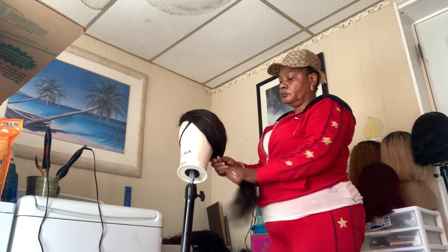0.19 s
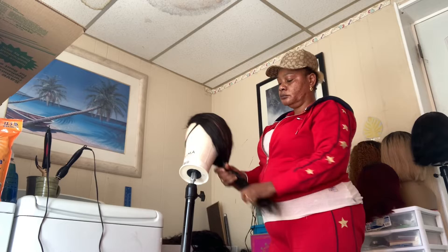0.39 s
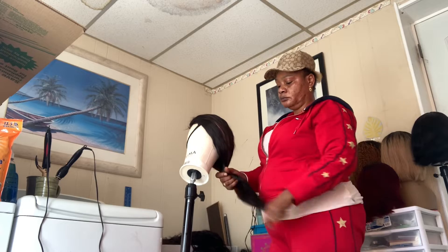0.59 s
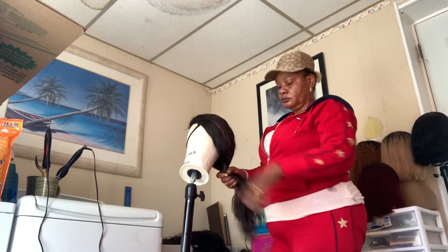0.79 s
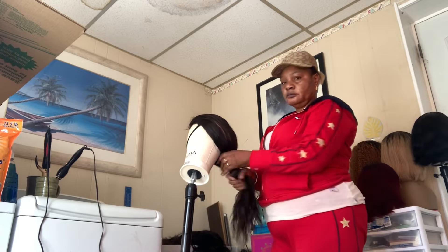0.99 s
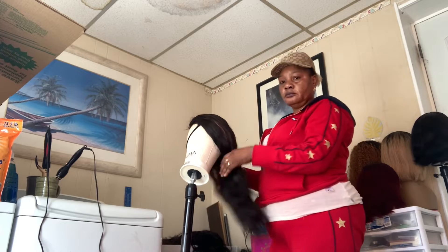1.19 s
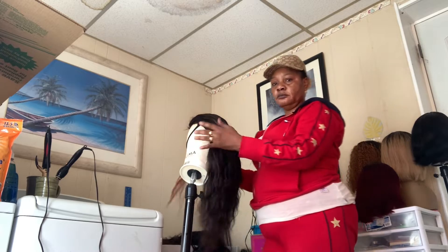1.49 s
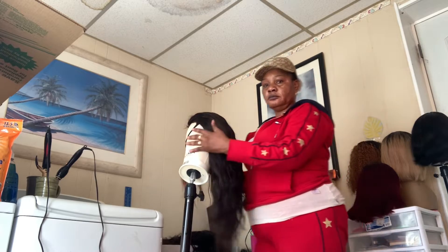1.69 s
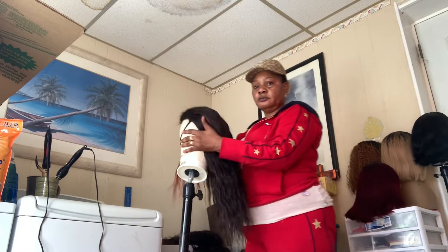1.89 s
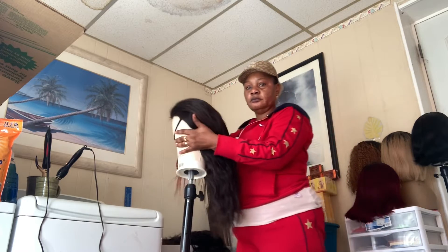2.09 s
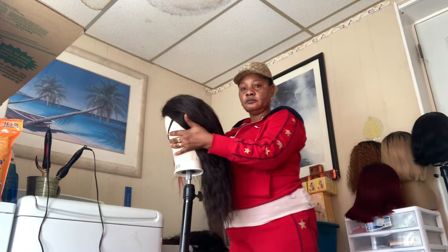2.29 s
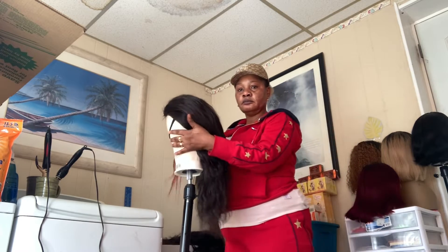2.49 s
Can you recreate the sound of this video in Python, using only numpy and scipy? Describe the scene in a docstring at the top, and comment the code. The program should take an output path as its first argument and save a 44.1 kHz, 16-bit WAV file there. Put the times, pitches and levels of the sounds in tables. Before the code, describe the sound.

Metal bangles clink in three brief moments, the last weaker, as hands smooth a long wig. Between and after them the mannequin head clicks drily on its stand; faint hair rustle, small quiet room, fairly close microphone.

```python
"""Metal bangles clink in three moments as an arm moves: hands smooth a long wig on a mannequin head
in a small, quiet room. Each clink is a coloured noise burst with a room tail, plus ringing modes.
The head clicks on its stand in the same way, and fingers and nails tick faintly.
Hair strokes are swells of coloured noise and snags; soft low bumps and a rumble lie beneath."""
import sys
import numpy as np
from scipy import signal
from scipy.fft import rfft, irfft
from scipy.io import wavfile

SR = 44100
rng = np.random.default_rng(int(sys.argv[2]) if len(sys.argv) > 2 else 0)


def dump_mix(stems):
    """Bounce the given channels to the path in sys.argv[1] as a 16-bit WAV at rate SR."""
    frames = np.atleast_2d(stems).T  # one column per channel
    limited = np.clip(frames, -1, 1)  # hard clip at full scale
    pcm = np.round(limited * 32767).astype(np.int16)
    wavfile.write(sys.argv[1], SR, pcm)


N = 114660
T = np.arange(N) / SR
AFTER = T[:SR // 2]  # time since a hit, s


def undb(db):
    """Decibels to gain."""
    return 10 ** (np.asarray(db) / 20)


def unit(x):
    """Scale to rms 1."""
    return x / np.sqrt(np.mean(x ** 2))


def freqs(size):
    """Frequencies in Hz of a spectrum of this length, kept above zero for logarithms."""
    return np.maximum(np.fft.rfftfreq(size, 1 / SR), 1)


def along(points, hz):
    """Read (Hz, value) points on a log-frequency axis."""
    point_hz, value = np.array(points).T
    return np.interp(np.log(hz), np.log(point_hz), value)


def noise(db, size):
    """Random-phase noise of rms 1 with the given spectrum in dB."""
    phases = np.exp(2j * np.pi * rng.random(size // 2 + 1))
    return unit(irfft(undb(db) * phases, size))


def white():
    """Flat noise as long as one hit."""
    return noise(np.zeros(len(AFTER) // 2 + 1), len(AFTER))


def colour(x, db):
    """Shape a sound with a causal (minimum-phase) filter of the given response and unit power gain."""
    size = len(x)
    cepstrum = irfft(np.log(unit(undb(db))), size)
    # folding the cepstrum onto positive time makes the filter causal
    cepstrum[1:size // 2] *= 2
    cepstrum[size // 2 + 1:] = 0
    return irfft(rfft(x) * np.exp(rfft(cepstrum)), size)


def swell(middle_s, half_s, db):
    """A smooth bell-shaped rise and fall around a moment."""
    return undb(db) * np.exp(-((T - middle_s) / half_s) ** 2)


def add(out, start_s, x):
    """Mix a sound in at a time."""
    i = max(int(start_s * SR), 0)
    out[i:i + len(x)] += x[:N - i]


# spectrum of the room's rumble and hiss: freq_hz [Hz], density_db [dB per Hz, relative]
AIR_COLOUR = [(15, -47), (25, -2), (102, 1.5), (170, -5.5), (249, -4.5), (416, -9), (560, -12.5),
              (714, -13.5), (1370, -17), (2050, -20.5), (3160, -18.5), (5430, -23.5), (5880, -21),
              (13200, -24.5), (16000, -28.5)]
AIR_DB, HUM_DB, HUM_HZ = -66, -77, 120


def room():
    """Steady noise, strongest in the lows, with a faint sine of mains hum."""
    air = undb(AIR_DB) * noise(along(AIR_COLOUR, freqs(N)), N)
    hum = undb(HUM_DB) * unit(np.sin(2 * np.pi * HUM_HZ * T))
    return air + hum


# soft low bumps of the handling: middle_s [s], half_length_s [s], level_db [dB], centre_hz [Hz]
BUMPS = [(0.963, 0.013, -59, 122), (1.027, 0.065, -61.5, 71.5), (1.666, 0.048, -61.5, 138),
         (1.973, 0.089, -64.5, 73.4)]


def bumps():
    """Body and stand shift: dull swells of noise, each gathered around one low frequency."""
    out = np.zeros(N)
    for middle_s, half_s, db, centre_hz in BUMPS:
        octaves = np.log2(freqs(N) / centre_hz)
        low_noise = noise(-20 * np.log10(1 + (octaves / 0.28) ** 2), N)
        out += swell(middle_s, half_s, db) * low_noise
    return out


# strokes over the hair: middle_s [s], half_length_s [s], level_db [dB], brightness_db [dB per octave]
STROKES = [(0.06, 0.12, -64.5, -1), (0.591, 0.087, -67, 1), (0.962, 0.022, -68, 3.5),
           (1.22, 0.056, -88, -3), (2.09, 0.13, -75.5, -4.5), (2.257, .05, -72.5, -2),
           (2.483, 0.13, -71, -3)]
# spectrum of the hair rustle: freq_hz [Hz], density_db [dB per Hz, relative]
HAIR_COLOUR = [(300, -65), (1200, -8), (3500, 3), (7000, -2.5), (12000, -7), (16000, -9)]
STRANDS_PER_S, STRAND_DB = 1200, -1  # mean rate of snags, and their level against the smooth slide


def hair():
    """Strands slide (noise) and snag (random impulses) under the palm, louder during each stroke."""
    hz, out = freqs(N), np.zeros(N)
    snags = (rng.random(N) < STRANDS_PER_S / SR) * rng.standard_normal(N)
    slide = rng.standard_normal(N)
    rub = rfft(slide + undb(STRAND_DB) * unit(snags))
    for middle_s, half_s, db, tilt in STROKES:
        rustle_db = along(HAIR_COLOUR, hz) + tilt * np.log2(hz)
        rustle = unit(irfft(rub * undb(rustle_db), N))
        out += swell(middle_s, half_s, db) * rustle
    return out


# fading of a hit in the room: freq_hz [Hz], t60_s [s to fall 60 dB]
ROOM_T60 = [(300, 0.14), (800, 0.19), (2000, 0.17), (5500, .16), (14000, 0.13)]
CRACK_S = 0.0037  # decay time of the hard noise
LATE_DB, LATE_T60_S = -38, 0.49  # slow late tail, level against the room's first tail
BUILD_CYCLES = 1.63  # cycles that a contact takes to swell: lows come late
SPIKE_DB = 5  # impulse at the first instant, against the noise
SAME_PATH = 0.58  # share of the reflections' power that all hits of one object have in common


def crack(db, room_db, path):
    """A contact: a spike, a few ms of hard noise, then a room tail with its own fade in each band."""
    hz = freqs(len(AFTER))
    reflections = np.sqrt(SAME_PATH) * path + np.sqrt(1 - SAME_PATH) * white()
    spectrum, out = rfft(reflections), np.zeros(len(AFTER))
    hard = np.exp(-AFTER / CRACK_S)
    late = undb(room_db + LATE_DB - 60 * AFTER / LATE_T60_S)
    # overlapping octave bands; each identity row picks one band
    centres = 250 * 2. ** np.arange(7)
    for centre, share in zip(centres, np.eye(len(centres))):
        band = irfft(spectrum * np.interp(np.log(hz), np.log(centres), share), len(AFTER))
        tail = undb(room_db - 60 * AFTER / along(ROOM_T60, centre))
        build = 1 - np.exp(-AFTER * centre / BUILD_CYCLES)
        out += band * build * np.sqrt(hard ** 2 + tail ** 2 + late ** 2)
    spike = undb(SPIKE_DB) * (AFTER == 0)
    return colour(out + spike, db)


WAVER_HZ, WAVER_DEPTH, WAVER_RISE_S = 64.6, 1, 0.0023  # two random phase steps per waver cycle
RING_BUILD_CYCLES = 10.9  # cycles that a mode takes to swell


def ring(modes, tilt):
    """Fading modes that waver more and more as their reflections arrive."""
    out = np.zeros(len(AFTER))
    reflected = WAVER_DEPTH * (1 - np.exp(-AFTER / WAVER_RISE_S))
    for hz, db, t60 in modes:
        steps = np.exp(2j * np.pi * rng.random(size=64))
        waver = np.interp(AFTER * 2 * WAVER_HZ, np.arange(len(steps)), steps)
        direct = steps[-1]
        tone = np.imag((direct + reflected * waver) * np.exp(2j * np.pi * hz * AFTER))
        build = 1 - np.exp(-AFTER * hz / RING_BUILD_CYCLES)
        # brightness pivots at 4 kHz
        fade = undb(db + tilt * np.log2(hz / 4000) - 60 * AFTER / t60)
        out += tone * build * fade
    return out


# faint ticks of fingers and nails:
# start_s [s], level_db [dB], centre_hz [Hz], width_oct [octaves], skirt_db [dB, broad skirt]
TICKS = [(0.4345, -43.5, 3660, 0.15, -8), (0.681, -56, 11700, 0.24, -28), (2.274, -67, 8000, 1, -13),
         (2.306, -61, 1300, 1, -9)]
TICK_ROOM_DB = -6.5


def nails():
    """Tiny contacts, each coloured by one resonance on a broad skirt."""
    out, hz = np.zeros(N), freqs(len(AFTER))
    for start_s, db, centre_hz, width_oct, skirt_db in TICKS:
        octaves = np.log2(hz / centre_hz)
        peak = np.exp(-2 * (octaves / width_oct) ** 2)
        skirt = undb(skirt_db) / (1 + octaves ** 2)
        tick = crack(20 * np.log10(peak + skirt), TICK_ROOM_DB, white())
        add(out, start_s, undb(db) * tick)
    return out


# clicks of the head on its stand:
# start_s [s], level_db [dB], brightness_db [dB per octave], room_db [dB], ring_db [dB]
CLICKS = [(.0084, -39, -0.5, -1.5, -53), (.3008, -34, .3, -11.5, -43), (.3148, -36, -1.5, -10, -47),
          (.3369, -34, .2, -11, -41.5), (1.0865, -43.5, -2.5, -5, -49), (1.6985, -48.5, -2.5, -6.5, -53),
          (1.7329, -37.5, 0, -5.5, -38.5), (1.7938, -36, 0, -3.5, -36), (1.8197, -37, 0.5, -6.5, -32.5),
          (1.8322, -38, -1, -7, -52), (1.886, -46, -1.5, -9, -61), (1.9152, -32, 0, -7, -33)]
# spectrum of a stand click: freq_hz [Hz], density_db [dB per Hz, relative]
CLICK_COLOUR = [(100, -14.5), (220, -2.5), (400, 3), (750, -3.5), (1300, 0), (2000, -0.5), (3000, -1.5),
                (4200, -0.5), (6000, -1.5), (9000, -6), (12500, -6.5), (16000, -14.5)]
# stand modes, one list per column: pitch_hz [Hz]
STAND_HZ = [410, 538, 1330, 1970, 2190, 2850, 3740, 4290, 4860, 6010]
# level_db [dB, relative]
STAND_DB = [-19.5, -14, -13, -15, -13, -15.5, -10, -26, -16, -17]
# t60_s [s to fall 60 dB]
STAND_T60_S = [0.12, 0.12, 0.14, 0.11, 0.083, 0.18, .13, 0.097, 0.17, 0.17]
RING_DULLING = 2  # the ring's brightness tilts this many times more than the click's


def stand():
    """The head slips on its stand in dry clicks that excite the stand's modes."""
    out, hz, path = np.zeros(N), freqs(len(AFTER)), white()
    for start_s, db, tilt, room_db, ring_db in CLICKS:
        click_db = along(CLICK_COLOUR, hz) + tilt * np.log2(hz)
        click = undb(db) * crack(click_db, room_db, path)
        modes = zip(STAND_HZ, STAND_DB, STAND_T60_S)
        add(out, start_s, click + undb(ring_db) * ring(modes, RING_DULLING * tilt))
    return out


# bangle contacts: start_s [s], level_db [dB], brightness_db [dB per octave], room_db [dB],
# ring_db [dB], ring_brightness_db [dB per octave]
CLINKS = [(0.2125, -22, -1, -6.5, -33.5, -0.5), (0.2137, -27, -1, -12, -47.5, -2),
          (0.7394, -37, 5.5, -12, -46, -5), (0.7444, -20, 1, -10.5, -39, -1.5),
          (0.747, -21.5, -1, -12.5, -39.5, 4.5), (0.7628, -26.5, -1.5, -12.5, -38.5, 3.5),
          (1.3654, -34.5, -1.5, -10, -47, 1)]
# spectrum of a bangle contact: freq_hz [Hz], density_db [dB per Hz, relative]
CLINK_COLOUR = [(200, -22.5), (520, -20.5), (710, -7), (900, -14.5), (1170, -2), (1480, -5), (1850, -4),
                (2200, -4), (2800, 4), (3600, 1.5), (4700, 5), (5600, -0.5), (6800, -6.5), (9000, -2.5),
                (12500, -2.5), (16000, -15)]
# bangle modes, one list per column: pitch_hz [Hz]
BANGLE_HZ = [1185, 1621, 2520, 3122, 3440, 3740, 3969, 4168, 4719, 5217, 5913, 7612, 11117, 15301]
# level_db [dB, relative]
BANGLE_DB = [-7, -13.5, -7, -25, -14, -11.5, -1, 2, 1.5, -9, -15, -5.5, 3, -6]
# t60_s [s to fall 60 dB]
BANGLE_T60_S = [0.19, 0.137, .21, .15, 0.16, 0.1465, .12, 0.049, 0.12, 0.079, .11, 0.14, 0.12, 0.12]


def bangles():
    """Metal bangles knock together and their modes ring briefly against the wrist."""
    out, hz, path = np.zeros(N), freqs(len(AFTER)), white()
    for start_s, db, tilt, room_db, ring_db, ring_tilt in CLINKS:
        knock_db = along(CLINK_COLOUR, hz) + tilt * np.log2(hz)
        knock = undb(db) * crack(knock_db, room_db, path)
        modes = zip(BANGLE_HZ, BANGLE_DB, BANGLE_T60_S)
        add(out, start_s, knock + undb(ring_db) * ring(modes, ring_tilt))
    return out


def scene():
    """All sources at one microphone."""
    return (room() + bumps() + hair() + nails() + stand() + bangles())[None]


LOW_CUT_HZ, TOP_HZ = 54, 16000


def record(dry):
    """The recorder cuts the deep bass gently and the top steeply."""
    low_cut = signal.butter(4, LOW_CUT_HZ, "high", fs=SR, output="sos")
    top_cut = signal.ellip(8, .2, 70, TOP_HZ, fs=SR, output="sos")
    return signal.sosfilt(top_cut, signal.sosfilt(low_cut, dry))


dry = scene()
out = record(dry)
dump_mix(out)
```